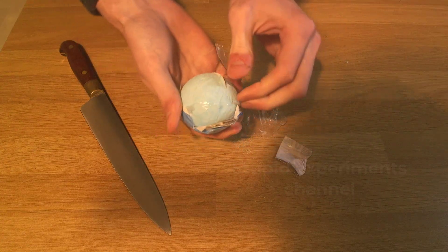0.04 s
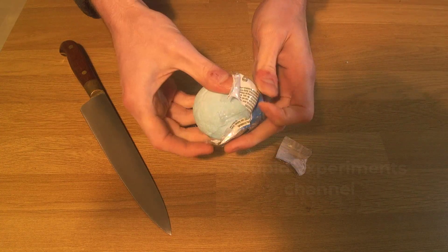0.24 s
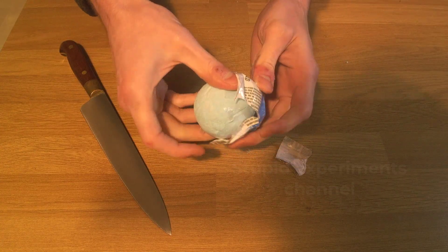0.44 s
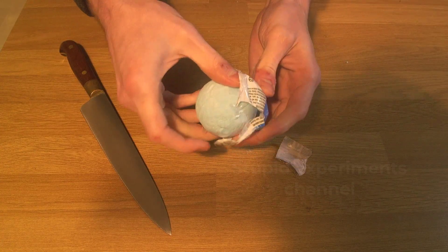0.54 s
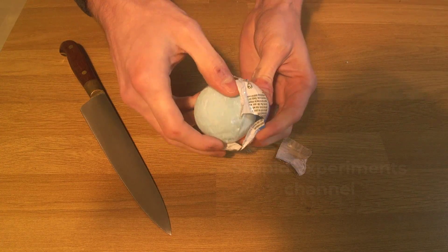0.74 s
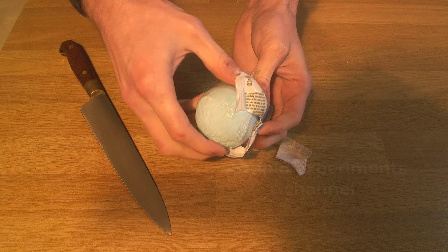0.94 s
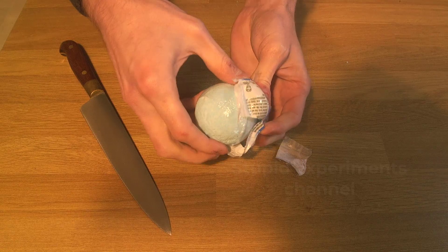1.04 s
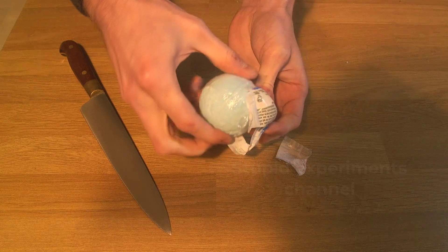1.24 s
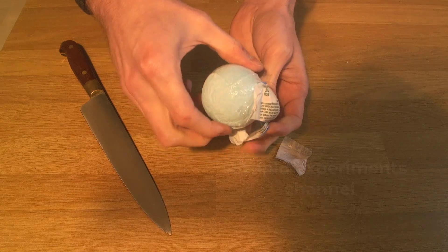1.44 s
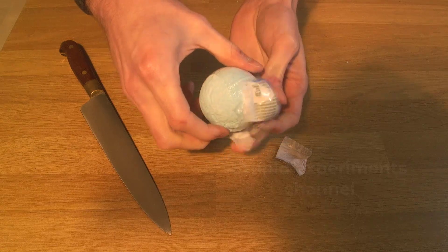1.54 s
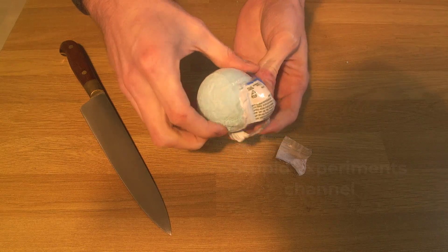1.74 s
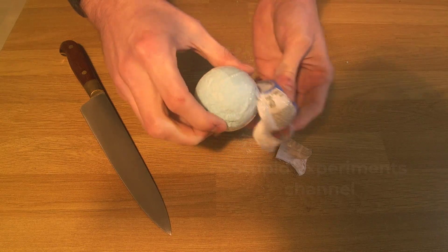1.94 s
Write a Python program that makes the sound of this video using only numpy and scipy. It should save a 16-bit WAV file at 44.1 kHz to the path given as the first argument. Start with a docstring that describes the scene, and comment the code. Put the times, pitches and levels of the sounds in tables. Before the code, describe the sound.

Crisp, irregular crinkling of a thin stiff wrapper being peeled from a round object, close up

```python
"""Peeling a stiff wrapper

Hands peel a thin stiff wrapper off a ball on a wooden table in a small quiet room, over a steady hush.
The wrapper snaps for a few milliseconds at a time: resonant noise bursts make a panel pop and a bright tick.
Soft thuds, single smooth pulses, accompany some snaps, and tiny decaying sine crackles fill the gaps.
A wall answers with smeared echoes, the table top rings in sine modes, and a noise tail is the room."""
import sys
import numpy as np
from scipy import signal
from scipy.fft import rfft, irfft, next_fast_len
from scipy.io import wavfile

SR = 44100
rng = np.random.default_rng(int(sys.argv[2]) if len(sys.argv) > 2 else 0)


def unload_audio(sound):
    """Save the sound as a 16-bit wav file, at the path given as the first command line argument."""
    columns = np.transpose(np.atleast_2d(sound))
    # keep every value between -1 and 1, then stretch to whole-number steps
    steps = np.round(np.clip(columns, -1, 1) * 32767)
    wavfile.write(sys.argv[1], SR, steps.astype(np.int16))


N = 88200  # samples, two seconds

# Spectrum of the hush as heard through the microphone.
# Each row: frequency in Hz, relative density in dB per Hz.
HUSH_SPECTRUM = [(25, -34), (200, -10), (450, 1), (1900, -3), (3200, -13), (11000, -15), (15000, -30)]
# Loudness of the fine crackle over time.
# Each row: time in seconds, base level in dB.
CRACKLE_LEVEL = [(.11, -85), (.14, -46.5), (.8, -42), (1.7, -46), (2, -43)]
# Snaps of the wrapper, some strong echoes of snaps, and a second pitch within one snap.
# Each row: time in seconds, pop level in dB, pop pitch in Hz, tick level in dB, tick pitch in Hz.
SNAP_EVENTS = [(0.1277, -36, 3250, -35.5, 7400), (0.1895, -39.5, 1230, -37, 10600),
               (0.2067, -29.5, 3680, -32.5, 7800), (0.2329, -31, 2140, -47, 8300),
               (0.2387, -36, 2510, -42.5, 10010), (0.2454, -34, 1220, -34.5, 7200),
               (0.2654, -36.5, 1540, -31, 8510), (0.2687, -21.5, 2090, -21.5, 6940),
               (0.2704, -29, 1670, -19, 10700), (0.2735, -24.5, 1435, -32, 4680),
               (0.2793, -25.5, 3500, -34, 6400), (0.281, -26, 3330, -42, 6190),
               (0.2937, -32.5, 2370, -51, 7900), (0.3051, -33.5, 3680, -24.5, 11300),
               (0.329, -36, 3650, -39, 8200), (0.334, -41, 3580, -53, 8300), (0.4007, -30, 1330, -27, 4500),
               (0.412, -30, 2330, -27.5, 7540), (0.49, -48, 2420, -35.5, 10100),
               (0.4974, -32, 1330, -44.5, 4530), (0.5017, -32, 1880, -22.5, 4500),
               (0.561, -33, 1610, -29, 6600), (0.5778, -28.5, 2400, -39, 8400),
               (0.597, -24, 1850, -36.5, 5830), (0.6437, -36, 1760, -66, 7300),
               (0.6739, -37.5, 1910, -38, 4750), (0.6923, -69, 1860, -54, 9410),
               (0.711, -26.5, 1835, -28.5, 10100), (0.7373, -37, 2560, -35, 5400),
               (0.7527, -34, 2870, -15.5, 7350), (0.762, -52, 2730, -26.5, 5660),
               (0.7906, -28.5, 2010, -36.5, 5660), (0.7933, -39, 2610, -29.5, 6280),
               (0.7962, -29.5, 2740, -26.5, 9700), (0.8063, -28.5, 2610, -45, 7350),
               (0.8248, -24, 2700, -20, 7350), (0.833, -31.0, 2850, -31, 10300),
               (0.883, -35, 3340, -23, 7600), (0.8925, -31.5, 1710, -41, 6800),
               (0.961, -51, 3700, -28.5, 4480), (0.9798, -34.5, 1720, -24.5, 10200),
               (0.9976, -37, 2820, -43, 7650), (1.0244, -54, 3200, -36.5, 4670),
               (1.0725, -37.5, 2920, -38, 8800), (1.109, -42, 3250, -41, 11170),
               (1.116, -44, 3450, -35.5, 4500), (1.1497, -39.5, 3180, -36, 9200),
               (1.1674, -31.5, 1860, -50, 6330), (1.175, -25.5, 2480, -21, 4450),
               (1.23, -43.5, 1190, -36, 4640), (1.2348, -43, 3080, -41, 7600),
               (1.253, -43.5, 1230, -37, 9100), (1.3031, -26.5, 2550, -24, 4950),
               (1.3247, -34, 1980, -38.5, 7250), (1.362, -45.5, 1300, -47, 5000),
               (1.3965, -32, 2020, -29.5, 7570), (1.4301, -32.0, 2330, -38.5, 9600),
               (1.453, -44.5, 2720, -49, 7600), (1.4947, -56, 4160, -32.5, 5800),
               (1.5076, -42, 2500, -37, 5400), (1.5801, -40.5, 2690, -39.5, 11600),
               (1.6057, -37, 2330, -36, 10400), (1.64, -38, 4090, -45, 6840),
               (1.646, -33.5, 1820, -48, 8400), (1.6524, -47, 2570, -30.5, 4400),
               (1.6544, -31, 2520, -36.5, 6980), (1.7013, -28.5, 2440, -27, 8300),
               (1.7018, -23.5, 3450, -25.5, 5300), (1.7235, -29, 3260, -29.5, 7900),
               (1.734, -52, 3260, -49, 7800), (1.7807, -53, 3650, -36.5, 11000),
               (1.799, -50, 2410, -38, 11100), (1.8102, -63, 3200, -35.5, 10700),
               (1.8295, -45, 3180, -43, 9600), (1.8483, -44.5, 1244, -32, 11700),
               (1.8587, -45.5, 3570, -40.5, 5400), (1.906, -42, 1480, -40.5, 5500),
               (1.9552, -46, 2100, -43.5, 8150)]
# Early reflections.
# Each row: delay in seconds, level in dB.
WALL_ECHOES = [(.0055, -21), (.0083, -12.5), (0.0097, -31.5)]
# How long the room tail lasts at each pitch.
# Each row: frequency in Hz, time to fall 60 dB in seconds.
ROOM_DECAY = [(300, 0.27), (1500, 0.49), (6000, 0.37), (14000, 0.27)]
# Tone of the room tail.
# Each row: frequency in Hz, relative level in dB.
ROOM_COLOUR = [(300, 10.5), (1500, -0.5), (6000, -0.5), (14000, -3)]
# Ringing modes of the table top.
# Each row: frequency in Hz, level in dB.
TABLE_MODES = [(1264, -23), (1633, -25), (2015, -26)]
# Soft low thuds that accompany some of the snaps.
# Each row: start in seconds, level in dB.
THUD_EVENTS = [(0.2708, -27.5), (0.4019, -48), (0.5013, -46), (0.6437, -44), (0.7526, -30), (0.824, -36),
               (0.961, -42), (1.1757, -38.5), (1.4291, -46.5), (1.5079, -44), (1.701, -38.5),
               (1.8491, -53.5)]
# Frequency response of the microphone.
# Each row: frequency in Hz, gain in dB.
MIC_RESPONSE = [(25, -40), (200, -20), (380, -6), (700, 0.5), (12000, -1), (15000, -14), (16700, -28.5)]

HUSH_DB = -54.5  # rms level ahead of the microphone
CRACKLE_COUNT, CRACKLE_SPREAD_DB = 950, 3
CRACKLE_HZ, CRACKLE_OCTAVES = 4470, 1.373  # middle pitch, and the furthest a pitch strays from it
CRACKLE_CYCLES = 3.46  # a crackle's envelope peaks at half this many cycles
RISE_S, POP_T60_S, TICK_T60_S = 0.00053, 0.0075, 0.0071  # attack time constant, and 60 dB decays
SPIKE, SPIKE_S = 3.04, 0.0007  # one spike over the burst's noise, and its delay
EVEN = 0.92  # how far a burst's ragged spectrum is evened out, 0-1
POP_Q, POP_SKIRT_DB = 3.6, 2  # sharpness of a pop, and the broad noise around it
TICK_Q, TICK_SKIRT_DB = 0.94, -7
ROOM_DB, ROOM_RISE_S = -7, 0.0012  # energy of the tail, and its rise time constant
TABLE_T60_S = 0.26
PUSH_S = 0.000073  # time constant of a thud's pulse
THUD_ROOM_DB = -1.5  # a thud stirs the room less than a snap does
ANSWERS = 6  # room answers that the snaps take turns through
TOP_HZ = 16800  # band limit of the microphone


def amp(db):
    """dB to gain."""
    return 10 ** (np.asarray(db) / 20)


def unit(x):
    """Each row to rms 1."""
    return x / np.sqrt(np.mean(x ** 2, -1, keepdims=True) + 1e-20)


def unit_burst(x):
    """Each row to the energy of 4 ms at rms 1."""
    return unit(x) * np.sqrt(0.004 * SR / x.shape[-1])


def along(points, hz):
    """Read a curve of (Hz, value) points on a log frequency axis."""
    f, value = np.transpose(points)
    return np.interp(np.log(hz + 1), np.log(f + 1), value)


def filtered(x, response):
    """Rows of x shaped by a complex response of frequency."""
    n = x.shape[-1]
    padded = next_fast_len(2 * n)
    spectrum = rfft(x, padded) * response(np.fft.rfftfreq(padded, 1 / SR))
    return irfft(spectrum, padded)[..., :n]


def resonance(f, hz, q):
    """Causal band-pass of peak 1, as of a single damped resonator."""
    damping = 1j * f * hz / q
    return damping / (hz * hz - f * f + damping)


def placed(seconds, rows):
    """Sum of short sounds starting at their times."""
    at = np.round(seconds * SR).astype(int)[:, None] + np.arange(rows.shape[1])
    return np.bincount(at.ravel(), rows.ravel(), N + SR)[:N]


def hush():
    """The steady floor of room and microphone: shaped noise."""
    def response(f):
        # the microphone's curve is taken out here because record() applies it
        return amp(along(HUSH_SPECTRUM, f) - along(MIC_RESPONSE, f))
    return amp(HUSH_DB) * unit(filtered(rng.standard_normal(N), response))


def crackles():
    """Tiny random ticks: sines of a few cycles that swell and die, mostly near the base level."""
    start = rng.uniform(0, N / SR, CRACKLE_COUNT)
    stray = rng.standard_normal((CRACKLE_COUNT, 1)).clip(-1, 1)
    hz = CRACKLE_HZ * 2 ** (CRACKLE_OCTAVES * stray)
    base_db = np.interp(start, *np.transpose(CRACKLE_LEVEL))[:, None]
    extra_db = CRACKLE_SPREAD_DB * rng.random((CRACKLE_COUNT, 1)) ** 2
    cycles = hz * np.arange(256) / SR
    envelope = cycles * np.exp(-2 * cycles / CRACKLE_CYCLES)
    return placed(start, amp(base_db + extra_db) * np.sin(2 * np.pi * cycles) * envelope)


def burst(count, t60, hz, q, skirt_db):
    """Noise with one spike rises at once and dies fast, heard through a resonance."""
    t = np.arange(1024) / SR
    envelope = (1 - np.exp(-t / RISE_S)) ** 2 * amp(-60 * t / t60)
    noise = rng.standard_normal((count, len(t)))
    noise[:, round(SPIKE_S * SR)] = SPIKE * np.sign(noise[:, 0])
    # half the envelope goes on before the evening, half after
    spectrum = rfft(np.sqrt(envelope) * noise)
    even_spectrum = spectrum / (abs(spectrum) + 1e-9) ** EVEN
    even = np.sqrt(envelope) * irfft(even_spectrum)

    def response(f):
        skirt = amp(skirt_db) * resonance(f, hz, q / 3) ** 2
        return resonance(f, hz, q) ** 2 + skirt
    return unit_burst(filtered(even, response))


def snaps():
    """Each row of the snap table sounds as a pop and a bright tick together; returns starts and sounds."""
    time, pop_db, pop_hz, tick_db, tick_hz = np.transpose(SNAP_EVENTS)[:, :, None]
    count = len(SNAP_EVENTS)
    pops = amp(pop_db) * burst(count, POP_T60_S, pop_hz, POP_Q, POP_SKIRT_DB)
    ticks = amp(tick_db) * burst(count, TICK_T60_S, tick_hz, TICK_Q, TICK_SKIRT_DB)
    return time[:, 0] - SPIKE_S / 2, pops + ticks


def room_tail():
    """Noise in which each frequency dies at its own speed; total energy 1."""
    hz, t, bands = signal.stft(rng.standard_normal(SR // 2), SR, nperseg=128)
    colour_db = along(ROOM_COLOUR, hz)[:, None]
    decay_db = -60 * t / along(ROOM_DECAY, hz)[:, None]
    tail = signal.istft(bands * amp(colour_db + decay_db), SR, nperseg=128)[1]
    tail = tail * (1 - np.exp(-np.arange(len(tail)) / SR / ROOM_RISE_S)) ** 2
    return tail / np.linalg.norm(tail)


def table_ring(length):
    """The table top's modes: sines at random phase, dying together."""
    t = np.arange(length) / SR
    ring = np.zeros(length)
    for hz, db in TABLE_MODES:
        mode = np.sin(2 * np.pi * (hz * t + rng.random())) * amp(-60 * t / TABLE_T60_S)
        ring += amp(db) * mode / np.linalg.norm(mode)
    return ring


def wall_echoes(length):
    """Early echoes, each smeared by rough walls into a short scrap of noise."""
    delay, db = np.transpose(WALL_ECHOES)
    smear = unit(rng.standard_normal((len(delay), 70))) / np.sqrt(70)  # energy 1 each
    return placed(delay, amp(db)[:, None] * smear)[:length]


def room(x):
    """The surroundings' answer to x: tail, table ring and echoes, drawn afresh on each call."""
    tail = room_tail()
    answer = amp(ROOM_DB) * tail + table_ring(len(tail)) + wall_echoes(len(tail))
    return signal.fftconvolve(x, answer)[:N]


def thuds():
    """Soft low thuds along with some of the snaps: one smooth one-sided pulse each."""
    start, db = np.transpose(THUD_EVENTS)
    u = np.arange(1024) / SR / PUSH_S
    pulse = unit_burst(u * np.exp(-u))
    return placed(start, amp(db)[:, None] * pulse)


def scene():
    """Snaps take turns through six randomly drawn room answers, so the tails vary."""
    floor = hush()
    groups = [crackles()]
    start, rows = snaps()
    groups += [placed(start[k::ANSWERS], rows[k::ANSWERS]) for k in range(ANSWERS)]
    peeling = sum(x + room(x) for x in groups)
    thud = thuds()
    thudding = thud + amp(THUD_ROOM_DB) * room(thud)
    return (peeling + thudding + floor)[None]


def record(dry):
    """A small microphone: thin bass, falling top, nothing above its band limit."""
    return filtered(dry, lambda f: amp(along(MIC_RESPONSE, f)) * (f < TOP_HZ))


dry = scene()
out = record(dry)
unload_audio(out)
```